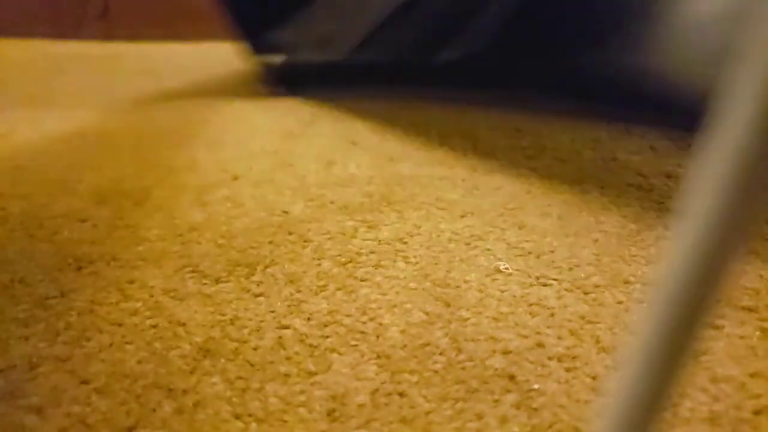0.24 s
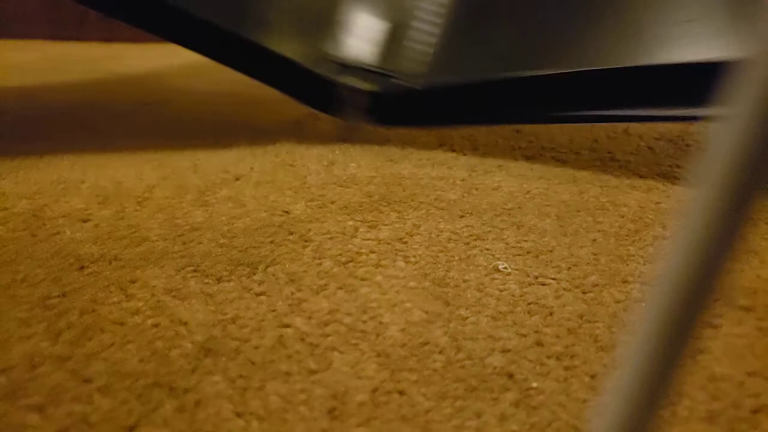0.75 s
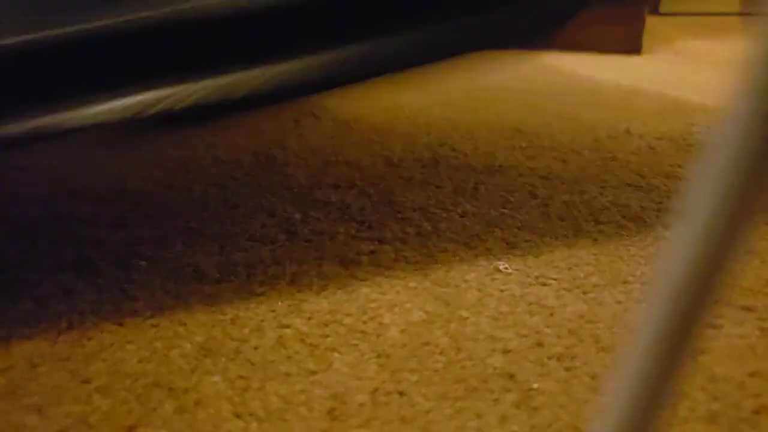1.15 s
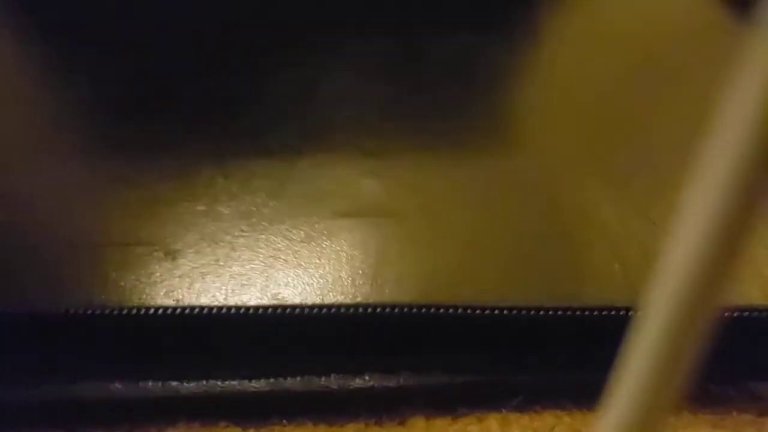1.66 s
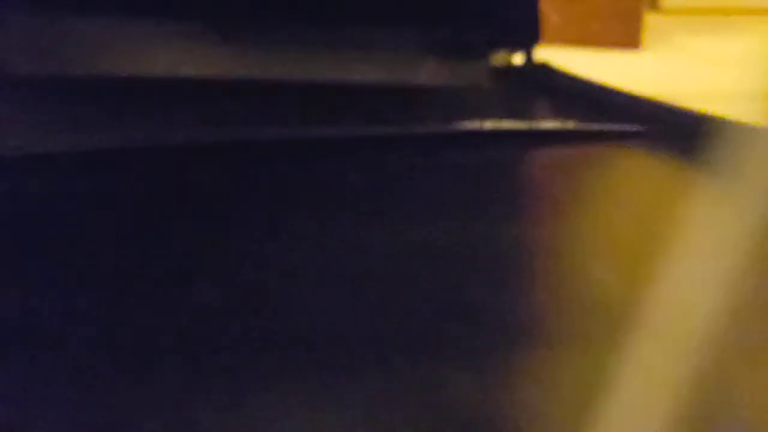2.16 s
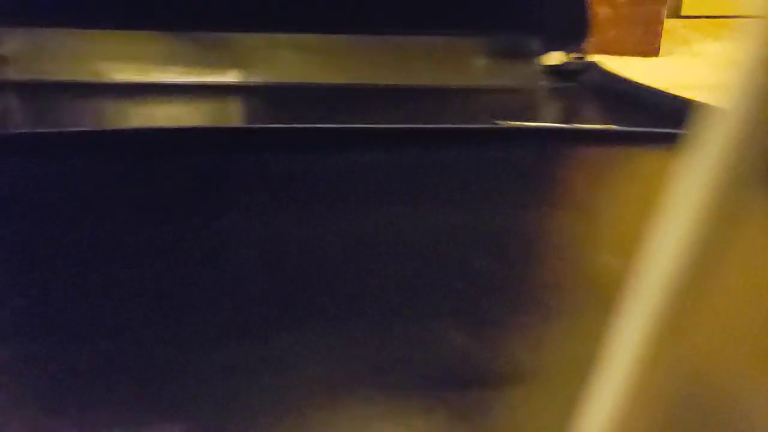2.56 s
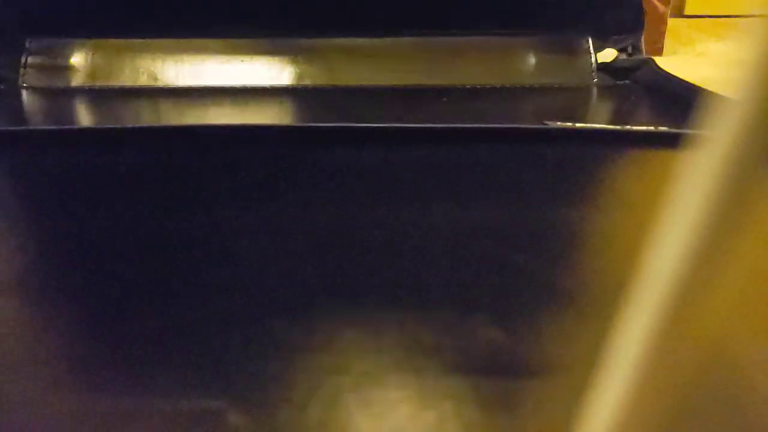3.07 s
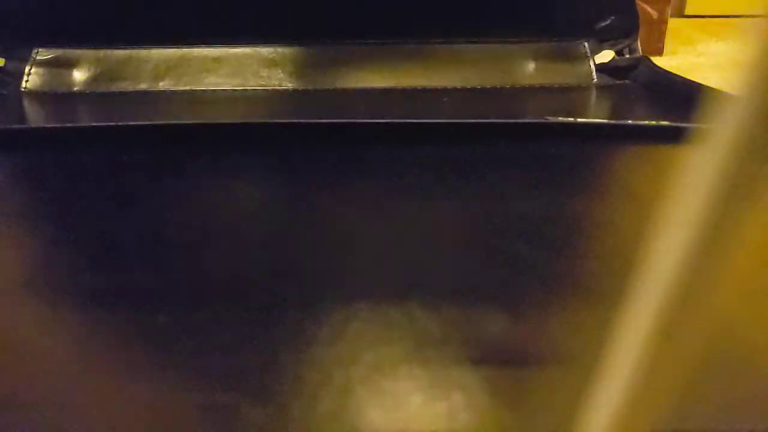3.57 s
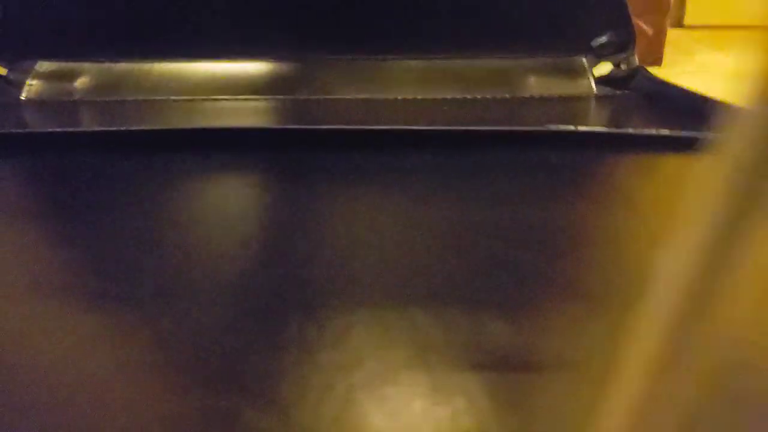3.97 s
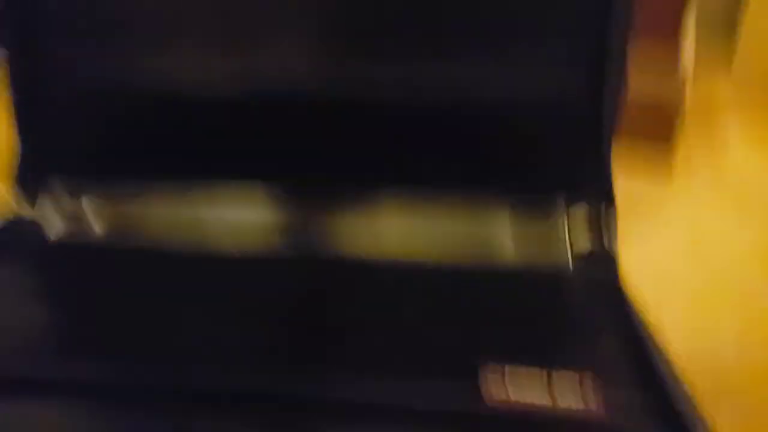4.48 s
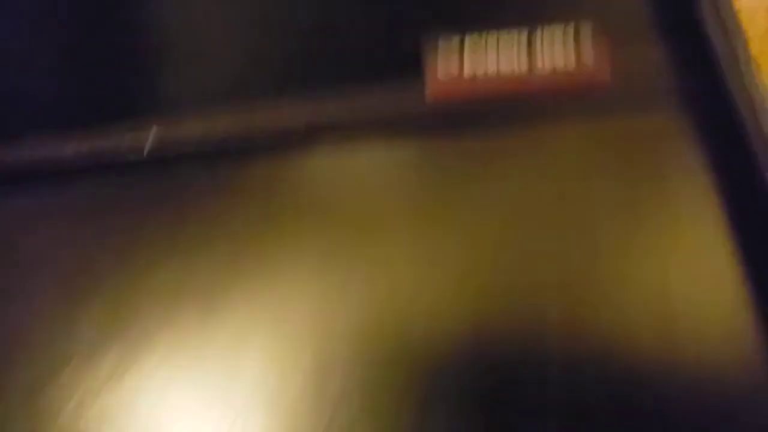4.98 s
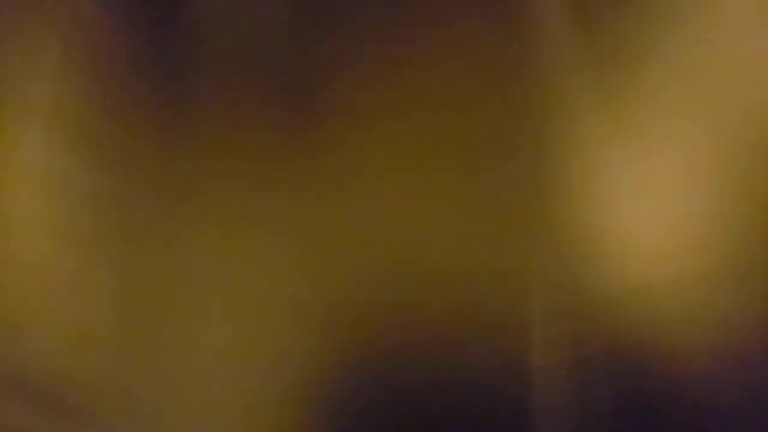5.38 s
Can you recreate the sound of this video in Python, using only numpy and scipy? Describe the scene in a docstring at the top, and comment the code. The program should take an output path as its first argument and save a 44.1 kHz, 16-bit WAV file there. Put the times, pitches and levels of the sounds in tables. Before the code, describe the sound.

A handheld camera microphone sits right beside a stiff leather case. Soft rubbing and fizzy zipper slides start quietly, metal snaps loudly on the shell, mainly at left, then it goes almost still over hiss and faint hum. Later come low bumps, knocks and ticks, a bright finger swish at right, and a final thump with tab jingle. The room is small, dry and carpeted.

```python
"""Quiet carpeted room: a zippered leather case is worked open right beside a handheld camera.
Leather and zipper tape rub in short runs (coloured noise made of tiny uneven slips).
The metal slider and pull strike the stiff shell (coloured impulses with noise scatter; ringing modes).
Hand and case bump the camera (decaying low sines and thuds), mostly at its right microphone port.
Beneath lie air noise, microphone hiss and a faint appliance hum."""
import sys
import numpy as np
from scipy import signal
from scipy.fft import rfft, irfft, next_fast_len
from scipy.io import wavfile
from scipy.ndimage import uniform_filter1d, map_coordinates

SR = 44100
rng = np.random.default_rng(int(sys.argv[2]) if len(sys.argv) > 2 else 0)


def store_wav(level_fs):
    """Save 16-bit WAV to argv[1]."""
    pcm = np.round(np.clip(np.atleast_2d(level_fs), -1, 1) * 32767)
    wavfile.write(sys.argv[1], SR, pcm.T.astype(np.int16))


N = 247838
HIT_SIZE = 16384  # samples per contact
BLOW_S = .005  # a contact's level is its energy spread over this time
PORT_LAG_MAX_S = .0003  # limit of the delay to the far port
RISE_SHARE = .45  # part of a stroke spent speeding up
HARDNESS_DB, HARDNESS_BEND = 25.5, 1.024  # fade per unit of hardness distance; exponent of the distance
TOP_HZ = 16100

# Event and path levels are relative: the layers add their own offsets. lr_db is left minus right.
# Flexing of the panels: [time_s, flex_db]
LEATHER_FLEX = [(0.0, -52), (0.09, -62.5), (0.7, -63), (1.31, -67.5), (1.49, -59), (1.86, -61),
                (2.0, -52.5), (2.16, -43.5), (2.8, -76), (3.63, -77.5), (3.96, -69.5), (4.19, -53.5),
                (4.27, -69), (4.44, -64), (4.73, -66.5), (5.42, -60), (5.54, -45), (5.62, -73.5)]
# Sliding runs: [start_s, length_s, level_db, pressure_db, brightness_db]
SLIDING_RUNS = [(0, 0.11, -53.5, 4.5, 3), (0.109, 0.058, -66, 8.5, 9.5), (0.191, .16, -70, -11, 14),
                (0.78, 0.46, -64.5, 1.5, 7.5), (0.994, 0.23, -52.5, -7, 8), (1.216, 0.24, -57, -4.5, 5),
                (1.415, 0.24, -49.5, -3.5, 3), (1.692, 0.15, -69.5, -26, 13), (1.8, 0.11, -64.5, 6, 9.5),
                (1.927, 0.18, -53.5, -3.5, 0), (2.21, 0.05, -39, -1, -29), (2.452, 0.38, -69.5, 9.5, 5.5),
                (2.822, 0.12, -76, 12, -3), (3.155, 0.18, -69, 1.5, 6.5), (3.324, 0.25, -82, -6.5, 17),
                (3.624, 0.023, -54, -8.5, 8.5), (3.648, 0.17, -55, -34, 3), (3.88, 0.054, -55.5, -11, 8),
                (3.934, 0.057, -60, -29, 4), (3.99, 0.27, -47, -12.5, -5.5), (4.131, 0.17, -44, -9, -4),
                (4.648, 0.071, -53, -4.5, -5), (4.837, 0.45, -60, 4.5, 1), (5.298, 0.16, -58.5, 5, 4),
                (5.437, 0.066, -41.5, 4.5, -1.5), (5.565, 0.077, -49, 1, -3)]
# Panels bulging and settling with a low rustle: [start_s, length_s, level_db]
PANEL_BULGES = [(0, 0.12, -44), (0.23, 0.19, -53.5), (1.3, 0.12, -47)]
# Firmness of the grip on the camera: [time_s, grip_db]
GRIP_FIRMNESS = [(0.0, -58.5), (0.69, -70), (1.05, -63.5), (1.88, -63), (2.13, -45), (2.74, -77),
                 (3.63, -82), (3.9, -59.5), (4.19, -46.5), (5.06, -60), (5.46, -60), (5.62, -45)]
# Soft bumps reaching the camera body: [start_s, level_db, pitch_hz]
BODY_THUMPS = [(.118, -35, 70), (0.492, -39.5, 177), (.916, -36, 71.5), (1.318, -39, 76),
               (1.358, -35.5, 78), (2.163, -34.5, 156), (2.185, -28.5, 132), (2.245, -22.5, 139),
               (4.053, -29, 95), (4.112, -27, 68), (4.19, -28.5, 105), (4.244, -21, 79), (4.269, -24, 188),
               (4.283, -20, 57.4), (4.337, -27.5, 73), (4.384, -25, 80.5), (4.64, -13, 70.4),
               (4.679, -26.5, 89), (4.705, -19.5, 58), (4.76, -25, 71), (5.454, -22, 127),
               (5.471, -18.5, 105), (5.496, -23, 122.6)]
# Pull tab jingles: [start_s, level_db]
TAB_JINGLES = [(.637, -34), (.782, -30.5), (5.319, -26.5), (5.468, -21.5), (5.581, -32)]
# Fittings ringing on after a firm blow: [start_s, level_db]
FITTING_RINGS = [(2.175, -42), (2.294, -35.5)]
# Small catches of the sliding surfaces: [start_s, level_db]
SURFACE_CATCHES = [(0.845, -35.5), (1.031, -32), (1.256, -38), (1.6771, -36.5), (2.4084, -44),
                   (2.4374, -43), (2.561, -36.5), (3.6287, -47), (3.883, -36), (4.016, -24),
                   (4.1445, -17.5), (4.335, -34), (4.3819, -32.5), (4.4403, -23), (4.4655, -37),
                   (4.6394, -19.5), (5.0692, -28.5), (5.0978, -30), (5.505, -23)]
# Slider, teeth and pull on the shell: [start_s, level_db, hardness (0 knock, .5 clack, 1 snap)]
SHELL_CONTACTS = [(1.0313, -43.5, 0.16), (2.1623, -15.5, 0.87), (2.1662, -17, 0.12), (2.1751, -14, .5),
                  (2.185, -18, 0.24), (2.1894, -21.5, 0.94), (2.1932, -18.5, .5), (2.196, -32, .6),
                  (2.2447, -17.5, 0.71), (2.295, -17, 0.28), (2.3882, -46, 0.24), (2.5628, -51, 0.21),
                  (4.0156, -30.5, 0.25), (4.0202, -40, 0.87), (4.114, -30, .25), (4.148, -43, .5),
                  (4.2236, -33, .5), (4.268, -18.5, 0.046), (4.2727, -17.5, 0.27), (4.2787, -24.5, 0.66),
                  (4.2832, -30.5, 0.64), (4.688, -41, 0.13), (4.76, -50.5, 0.036), (5.098, -41, 0.18),
                  (5.1311, -43, 0.34), (5.156, -37.5, 0.19), (5.1836, -46, 0.0098), (5.3468, -33.5, .35),
                  (5.4503, -19, 0), (5.4581, -18.5, 0.15), (5.469, -23, 0.14)]
# Finger on the right port as the lid swings up: [time_s, level_db]
FINGER_BRUSH = [(4.44, -75.5), (4.48, -61.5), (4.56, -57), (4.68, -48.5), (4.74, -61), (4.84, -62),
                (4.9, -64.5)]

# Gripping hand, nearing the right port until it lets go: [time_s, lr_db]
HAND_PATH = [(0, 0.5), (2.1, 2), (2.25, -5.5), (3.5, -4), (3.7, -20.5), (4.25, -21), (4.65, -42),
             (4.95, -4.5), (5.4, 6.5)]
# Slider, passing close to the left port: [time_s, lr_db]
SLIDER_PATH = [(1, 1.5), (1.9, 12), (2.17, 20), (2.3, 36), (2.4, -11), (3.95, 9.5), (4.25, 15.5), (4.7, 9),
               (5.46, -2.5)]

# Modes of the larger fittings: [mode_hz, level_db, t60_s]
FITTING_MODES = [(1570, -3.5, 0.35), (2520, -8, .14), (2760, -6, 0.099), (3010, -4.5, 0.11),
                 (4770, -8.5, .1)]
# Modes of the pull tab: [mode_hz, level_db, t60_s]
TAB_MODES = [(8070, -6.5, 0.04), (11800, -24, .03), (15540, 11, 0.03), (15750, -14, .04)]
# Appliance hum tones: [tone_hz, level_db]
HUM_TONES = [(119, -78), (182, -81), (331, -79.5), (1750, -89)]
# Decay of the room: [band_hz, t60_s]
ROOM_DECAY = [(100, 1), (500, 0.27), (2000, 0.17), (6000, 0.14), (14000, .15)]

# Rubbing spectra, low rustle to fine fizz: [band_hz, density_db]
RUSTLE_COLOUR = [(90, -22), (190, -1), (270, -1), (350, -0.5), (480, -3), (700, -7), (1000, -20.5),
                 (2000, -38)]
CREAK_COLOUR = [(450, -19), (850, 8), (1300, -2), (1800, -0.5), (2500, -7.5), (3500, -15.5), (6000, -30)]
RASP_COLOUR = [(1500, -14), (2800, -5), (4000, -1.5), (5500, 1), (7000, 1), (8200, -17.5), (10000, -13.5),
               (14000, -34.5)]
FIZZ_COLOUR = [(3000, -32.5), (7000, -1.5), (8800, -10), (10500, -4), (12000, 1.5), (14500, 1),
               (15800, 3.5), (16300, -22)]
# Skin on the port: [band_hz, density_db]
SKIN_COLOUR = [(1500, -18), (2700, -4), (3500, -2.5), (4300, -3.5), (7000, -7)]
# Contact spectra, dull to sharp: [band_hz, density_db]
KNOCK_COLOUR = [(90, -20), (260, -4.5), (360, 1), (470, -2), (610, 2), (760, -8), (1000, -10),
                (2500, -42.5)]
CLACK_COLOUR = [(600, -16.5), (950, -0.5), (1230, 4), (1600, 3.5), (2050, 0.5), (2600, -4), (3300, -3.5),
                (6000, -34)]
SNAP_COLOUR = [(1200, -31.5), (2700, -0.5), (3500, 2), (5000, 0.5), (6800, -2), (8200, -20.5),
               (12000, -18.5), (16000, -30)]
# Grip rumble and body thud: [band_hz, density_db]
RUMBLE_COLOUR = [(20, -24.5), (35, -8), (55, 0.5), (120, -7), (180, -8), (300, -26.5), (700, -55.5)]
BUMP_COLOUR = [(20, -16), (45, 2.5), (110, 3), (220, -11), (450, -26), (900, -39.5), (2500, -60.5)]
# Quiet air and microphone hiss: [band_hz, density_db]
AIR_COLOUR = [(30, -9), (60, 2), (250, -2.5), (450, -14.5), (1000, -19.5), (3000, -34), (9000, -30.5),
              (12500, -25), (16000, -24)]


def amp(db):
    """Decibels to gain."""
    return 10 ** (np.asarray(db) / 20)


def unit(x):
    """Scale x to rms 1."""
    return x / np.sqrt(np.mean(x ** 2) + 1e-20)


def blow(x):
    """Scale x to the energy of a 0 dB contact."""
    energy = np.mean(np.sum(x ** 2, axis=-1))
    return x * np.sqrt(BLOW_S * SR / energy)


def along(points, hz):
    """Interpolate (Hz, value) points on a log frequency axis."""
    f, v = np.transpose(points)
    return np.interp(np.log(hz + 1), np.log(f + 1), v)


def colour(points, hz):
    """Spectral gain, falling on beyond both ends down to a small floor."""
    below = np.minimum((hz + 1) / points[0][0], 1)
    above = np.minimum(points[-1][0] / (hz + 1), 1)
    return amp(along(points, hz)) * (below * above) ** 2 + 1e-6


def side(path, s):
    """Value of a two-column path at time s."""
    return np.interp(s, *np.transpose(path))


def curve(path):
    """The path at every sample."""
    return side(path, np.arange(N) / SR)


def hiss_side(s):
    """L-R dB of the finest hiss, which leans toward the hand."""
    return .5 * side(HAND_PATH, s) - 4.5


def wobble(knots_per_s):
    """Smooth random curve through normal knots."""
    knots = rng.standard_normal(int(N * knots_per_s / SR) + 4)
    return map_coordinates(knots, [np.arange(N) * knots_per_s / SR])


def filtered(x, response):
    """Apply a response of frequency, with padding for its tail."""
    m = next_fast_len(N + SR // 2)
    hz = np.fft.rfftfreq(m, 1 / SR)
    return irfft(rfft(x, m) * response(hz), m)[..., :N]


def ports(pan_db):
    """Left and right port gains of mean power 1."""
    gains = amp(np.array([pan_db, -pan_db]) / 2).reshape(2, -1)
    return gains / np.sqrt(np.mean(gains ** 2, axis=0))


def placed(x, pan_db):
    """A contact is louder and earlier at the nearer port."""
    lag_s = PORT_LAG_MAX_S * np.tanh(np.log(amp(pan_db)) / 2)
    delay_s = np.maximum([[-lag_s], [lag_s]], 0)
    hz = np.fft.rfftfreq(HIT_SIZE, 1 / SR)
    return ports(pan_db) * irfft(rfft(x) * np.exp(-2j * np.pi * hz * delay_s))


def pair(alike, size):
    """Two white noises sharing the power fraction alike."""
    noise = rng.standard_normal((3, size))
    return np.sqrt(alike) * noise[0] + np.sqrt(1 - alike) * noise[1:]


def add(track, s, x):
    """Mix x into the track from time s."""
    part = track[:, round(s * SR):][:, :x.shape[-1]]
    part += x[..., :part.shape[-1]]


def strike(spectrum, t60, scatter, alike):
    """Contact force: an impulse plus decaying scatter (t60 in s), through a minimum-phase colour."""
    t = np.arange(HIT_SIZE) / SR
    # folding the cepstrum makes the colour causal
    cepstrum = irfft(np.log(colour(spectrum, np.fft.rfftfreq(HIT_SIZE, 1 / SR))))
    cepstrum[1:HIT_SIZE // 2] *= 2
    cepstrum[HIT_SIZE // 2 + 1:] = 0
    push = blow(1.0 * (t == 0))
    dying = blow(pair(alike, HIT_SIZE) * amp(-60 * t / t60))
    return blow(irfft(rfft(push + scatter * dying) * np.exp(rfft(cepstrum))))


def friction(spectrum, alike, grain_rate, grain_db, patchy_db):
    """Rubbing of rms 1: tiny slips of uneven size, whose colour shifts as the contact moves."""
    slips = pair(alike, N) * amp(grain_db * wobble(grain_rate))
    z = signal.stft(slips, nperseg=512)[2]
    field = rng.standard_normal(z.shape[1:])
    field = uniform_filter1d(field, size=7, axis=0)
    field = uniform_filter1d(field, size=10, axis=1)
    slips = signal.istft(z * amp(patchy_db * unit(field)), nperseg=512)[1][:, :N]
    return unit(filtered(slips, lambda hz: colour(spectrum, hz)))


def stroke(start, length):
    """Speed of a movement that gathers, peaks and stops."""
    phase = (np.arange(N) / SR - start) / length
    return np.sin(np.pi / 2 * np.interp(phase, [0, RISE_SHARE, 1], [0, 1, 0]))


def effort():
    """Gains of rustle, creak, rasp, fizz: flexing drives all; runs and bulges add power."""
    flex_db = curve(LEATHER_FLEX) + 0.41 * wobble(12)
    power = amp([flex_db + 1.0, flex_db - 8.5, 1.285 * flex_db + 7.0, 0.68 * flex_db - 22]) ** 2
    for start, length, db, pressure_db, bright_db in SLIDING_RUNS:
        speed = stroke(start, length)
        span = speed > 0
        levels_db = db + np.array([pressure_db - 1.5, pressure_db - .5, 0, bright_db])
        power[:, span] += (amp(levels_db)[:, None] * speed[span] ** .9) ** 2
    for start, length, db in PANEL_BULGES:
        power[0] += (amp(db) * stroke(start, length)) ** 2
    return np.sqrt(power)


def leather(rustle_gain, creak_gain):
    """The panels rustle and creak as they bend and drag."""
    rustle = rustle_gain * friction(RUSTLE_COLOUR, alike=0.67, grain_rate=90, grain_db=4.07, patchy_db=1.8)
    creak = creak_gain * friction(CREAK_COLOUR, alike=0.079, grain_rate=250, grain_db=1.5, patchy_db=3.5)
    return rustle * ports(pan_db=.5) + creak * ports(pan_db=3.5)


def crackle(creak_gain):
    """Bending leather lets go in tiny random cracks, stronger as it creaks more."""
    cracks_per_s = 40
    sizes = amp(4 * np.clip(rng.standard_normal(N), -2, 2))
    cracks = (rng.random(N) < cracks_per_s / SR) * sizes * creak_gain
    crack = strike(CREAK_COLOUR, t60=.012, scatter=0.94, alike=0.21)
    crack = crack + amp(-4.0) * strike(RASP_COLOUR, t60=.008, scatter=0.86, alike=0.66)
    return amp(-2.5) * signal.fftconvolve(cracks[None], crack, axes=1)[:, :N]


def zipper_runs(rasp_gain, fizz_gain):
    """The zipper tape slides: a grainy rasp at the slider under a fine fizz."""
    t = np.arange(N) / SR
    rasp = rasp_gain * friction(RASP_COLOUR, alike=0.12, grain_rate=600, grain_db=2.0, patchy_db=4.1)
    fizz = fizz_gain * friction(FIZZ_COLOUR, alike=0.1, grain_rate=680, grain_db=2, patchy_db=1.8)
    return rasp * ports(side(SLIDER_PATH, t)) + fizz * ports(hiss_side(t))


def background():
    """Still air, microphone hiss and a faint hum whose phase wavers more in its higher tones."""
    t = np.arange(N) / SR
    hum = 0
    for hz, db in HUM_TONES:
        level = np.sqrt(2) * amp(db + 1.7 * wobble(4.6))
        waver_rad = hz / 550 * wobble(45)
        hum = hum + level * np.sin(2 * np.pi * hz * t + waver_rad)
    air = unit(filtered(pair(alike=.4, size=N), lambda hz: colour(AIR_COLOUR, hz)))
    return hum + amp(-76) * air


def handling():
    """Bumps rock the camera in damped sines, its ports out of step; the grip rumbles throughout."""
    rumble = friction(RUMBLE_COLOUR, alike=0.7, grain_rate=30, grain_db=2, patchy_db=6.0)
    out = amp(curve(GRIP_FIRMNESS) + 8.5) * ports(curve(HAND_PATH)) * rumble
    t = np.arange(HIT_SIZE) / SR
    envelope = amp(-60 * t / 0.069) * (1 - np.exp(-t / 0.0034))
    for s, db, hz in BODY_THUMPS:
        phase = 2 * np.pi * hz * t + np.array([[1.2], [0]])  # left leads, rad
        rock = blow(np.sin(phase) * envelope)
        thud = amp(-5.5) * strike(BUMP_COLOUR, t60=0.09, scatter=1.2, alike=0.91)
        add(out, s, amp(db) * (rock + thud) * ports(side(HAND_PATH, s)))
    return out


def ring(modes, spread_db):
    """Metal modes at new strengths for each blow and port; the loose fit blurs their pitch."""
    t = np.arange(HIT_SIZE) / SR
    out = 0
    for hz, db, t60 in modes:
        level_db = db + spread_db * rng.standard_normal((2, 1))
        drift = .009 * np.cumsum(rng.standard_normal((2, HIT_SIZE)), axis=1)
        cycles = hz * t + rng.random((2, 1)) + drift
        out = out + amp(level_db - 60 * t / t60) * np.sin(2 * np.pi * cycles)
    return out


def metal():
    """The pull tab jingles high up; the larger fittings ring lower and longer."""
    out = np.zeros((2, N))
    for s, db in TAB_JINGLES:
        touch = amp(-9.0) * strike(FIZZ_COLOUR, t60=0.038, scatter=4.3, alike=0.11)
        add(out, s, amp(db - 8.0) * (blow(ring(TAB_MODES, spread_db=3.5)) + touch))
    for s, db in FITTING_RINGS:
        add(out, s, amp(db) * ring(FITTING_MODES, spread_db=3.5) * ports(pan_db=7.5))
    return out


def ticks():
    """The sliding surfaces catch and let go: a short snap with a fizz."""
    out = np.zeros((2, N))
    for s, db in SURFACE_CATCHES:
        snap = amp(db - 25) * strike(SNAP_COLOUR, t60=0.013, scatter=9.0, alike=1.0)
        fizz = amp(db - 16.5) * strike(FIZZ_COLOUR, t60=0.015, scatter=1.0, alike=0.023)
        add(out, s, (snap + fizz) * ports(hiss_side(s)))
    return out


def clacks():
    """Contacts knock the shell, clack the slider and snap at the tip; hardness sets the blend."""
    out = np.zeros((2, N))
    for s, db, hardness in SHELL_CONTACTS:
        distance = np.abs(hardness - np.array([0, .5, 1]))
        knock_gain, clack_gain, snap_gain = amp(db - HARDNESS_DB * distance ** HARDNESS_BEND)
        clack_pan = side(SLIDER_PATH, s)
        knock_pan = 0.39 * clack_pan + .9 * side(HAND_PATH, s)  # the knock also travels through the hand
        distant = amp(-.4 * abs(clack_pan))  # right at one port: a bare spike, little scatter
        knock = knock_gain * strike(KNOCK_COLOUR, t60=0.039, scatter=1.0, alike=0.93)
        clack = clack_gain * strike(CLACK_COLOUR, t60=0.023, scatter=2.1 * distant, alike=0.15)
        snap = snap_gain * strike(SNAP_COLOUR, t60=0.035, scatter=distant, alike=0.24)
        add(out, s, placed(knock, knock_pan) + placed(clack + snap, clack_pan))
    return out


def room(x):
    """The carpeted room answers with decaying noise, the bass lasting longest."""
    hz, t, z = signal.stft(rng.standard_normal((2, SR * 3 // 4)), SR, nperseg=256)
    decay = amp(-60 * t / along(ROOM_DECAY, hz)[:, None])
    tail = signal.istft(z * decay, SR, nperseg=256)[1]
    tail = np.pad(tail, ((0, 0), (int(.005 * SR), 0)))  # 5 ms before the answer
    airborne = x[:1]  # left port only: what only the right hears is touch on the camera body
    return signal.fftconvolve(airborne, tail / np.linalg.norm(tail[0]), axes=1)[:, :N]


def brush():
    """Skin passing over the right port gives a narrow, bright swish."""
    swish = friction(SKIN_COLOUR, alike=.3, grain_rate=750, grain_db=3.5, patchy_db=2)
    return amp(curve(FINGER_BRUSH)) * ports(pan_db=-14) * swish


def scene():
    """Contacts and rubbing close to the ports, with a little room."""
    rustle, creak, rasp, fizz = effort()
    hits = crackle(creak) + metal() + ticks() + clacks()
    rubbing = leather(rustle, creak) + zipper_runs(rasp, fizz) + brush()
    return hits + amp(-27.0) * room(hits) + rubbing + handling() + background()


def record(dry):
    """The camera thins the deepest bass, clips at full scale and cuts steeply above its band limit."""
    thinned = filtered(dry, lambda hz: 1j * hz / (22 + 1j * hz))
    clipped = np.clip(thinned, -1, 1)
    return filtered(clipped, lambda hz: 1 / np.sqrt(1 + (hz / TOP_HZ) ** 260))


dry = scene()
out = record(dry)
store_wav(out)
```